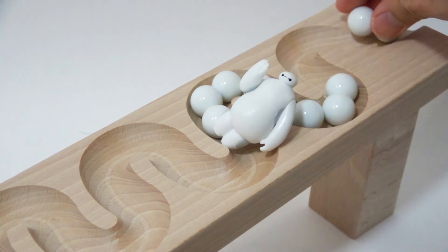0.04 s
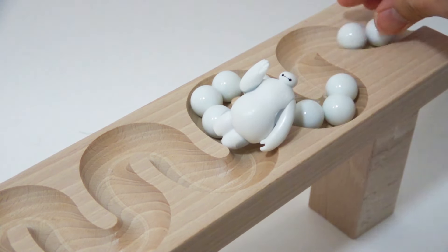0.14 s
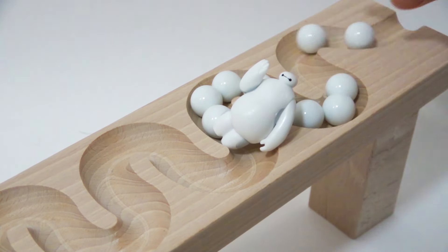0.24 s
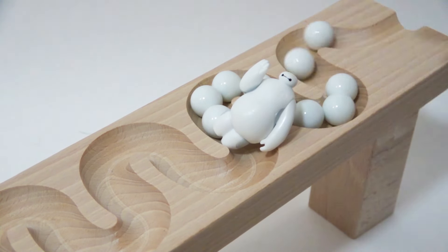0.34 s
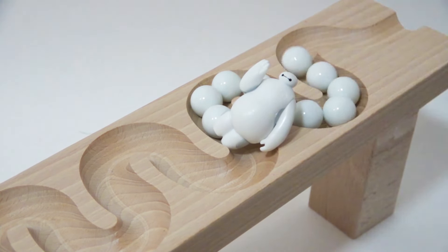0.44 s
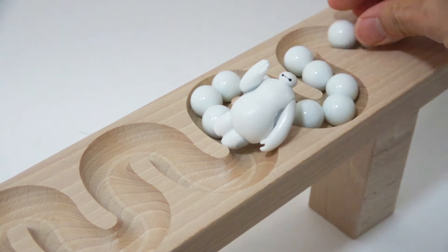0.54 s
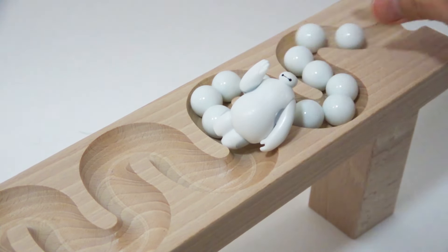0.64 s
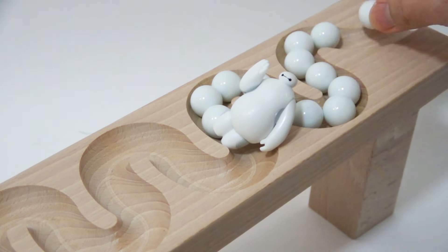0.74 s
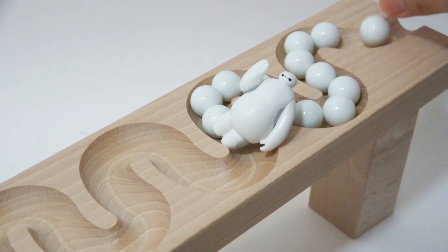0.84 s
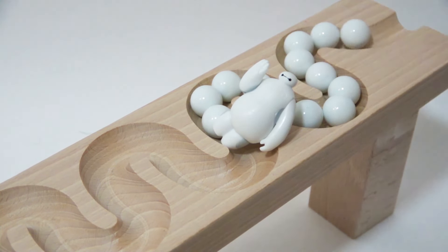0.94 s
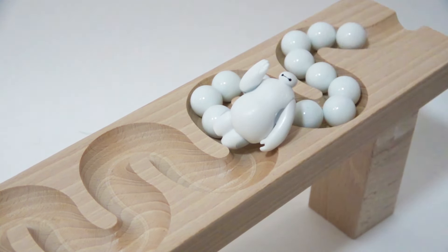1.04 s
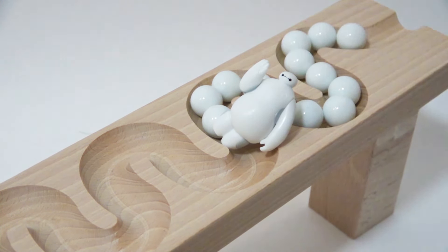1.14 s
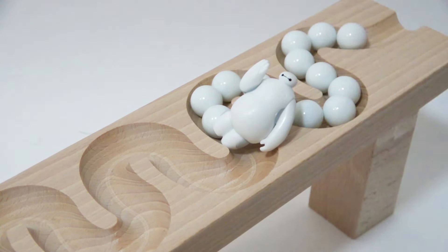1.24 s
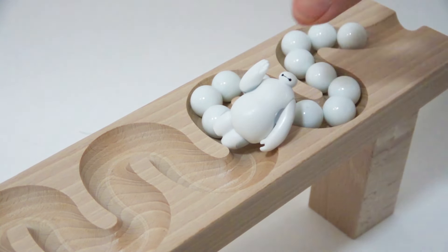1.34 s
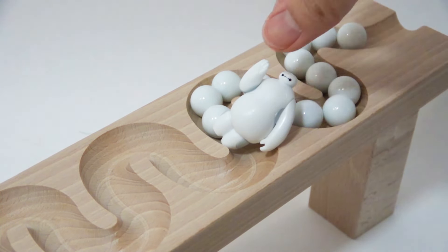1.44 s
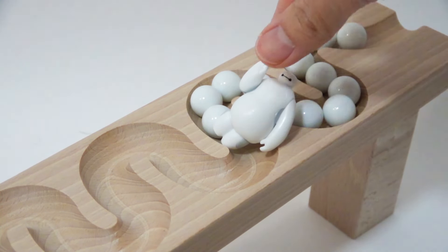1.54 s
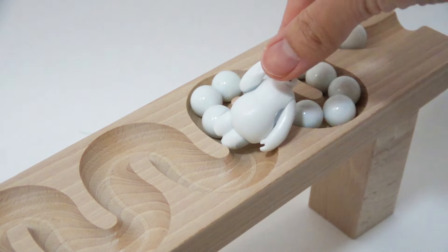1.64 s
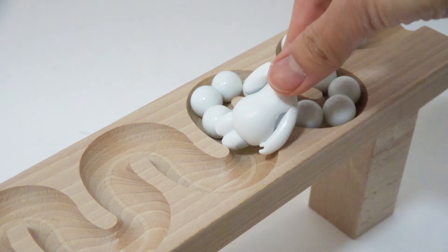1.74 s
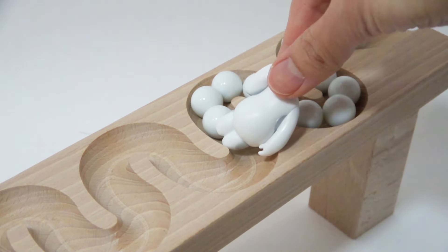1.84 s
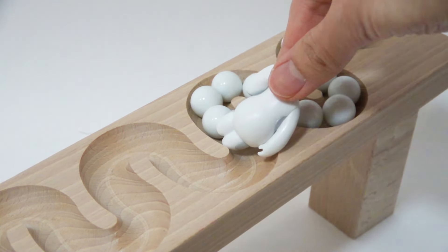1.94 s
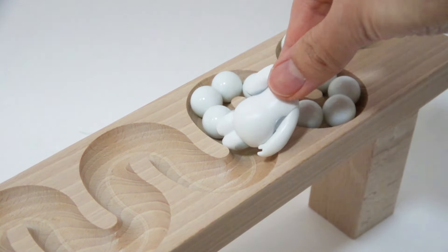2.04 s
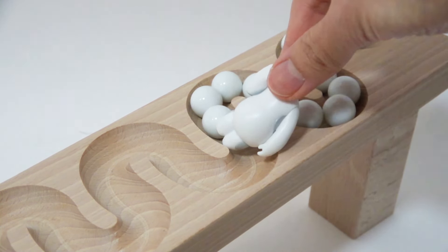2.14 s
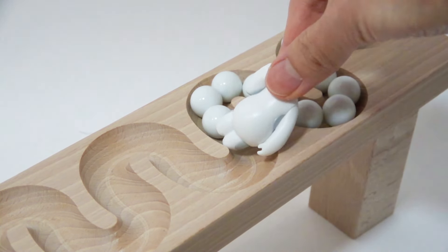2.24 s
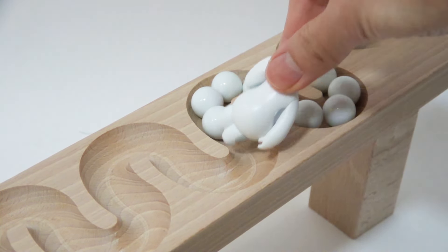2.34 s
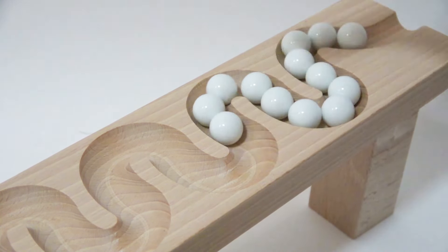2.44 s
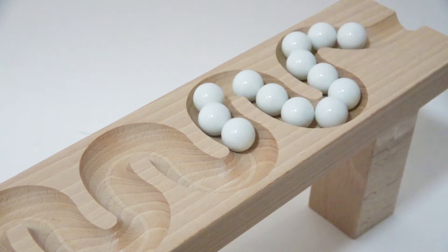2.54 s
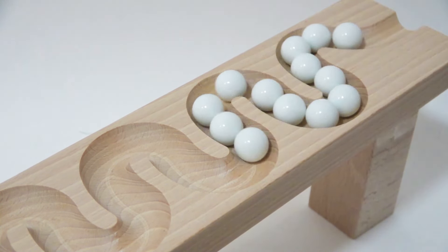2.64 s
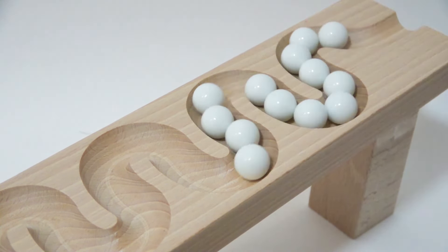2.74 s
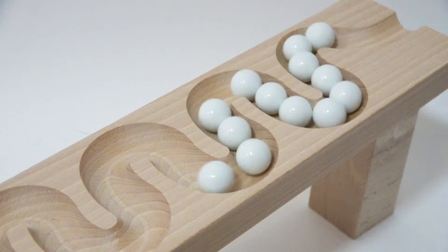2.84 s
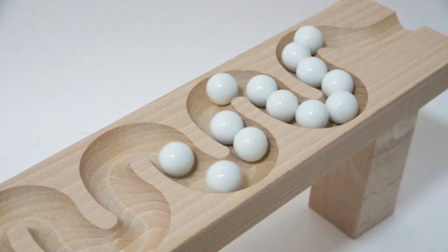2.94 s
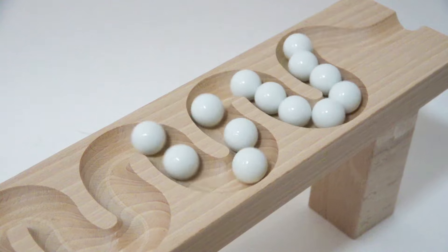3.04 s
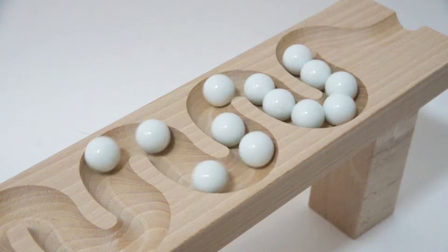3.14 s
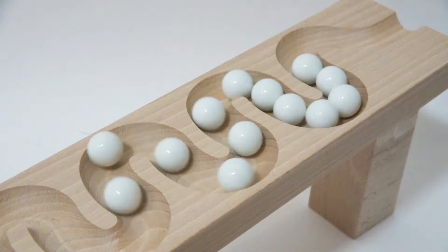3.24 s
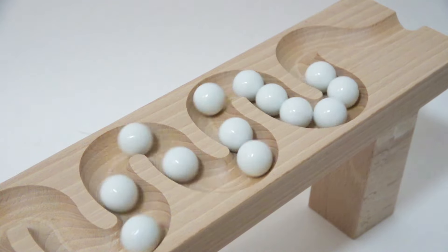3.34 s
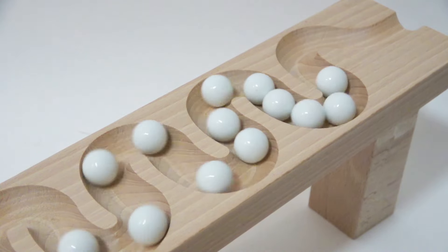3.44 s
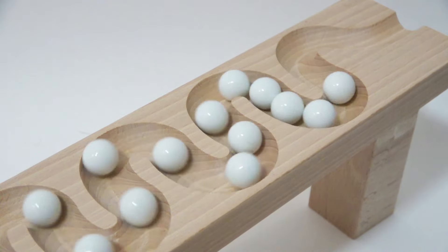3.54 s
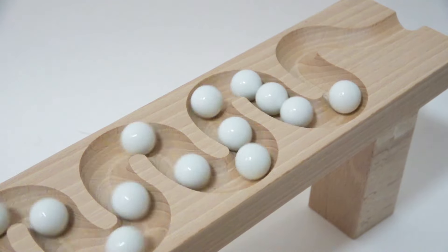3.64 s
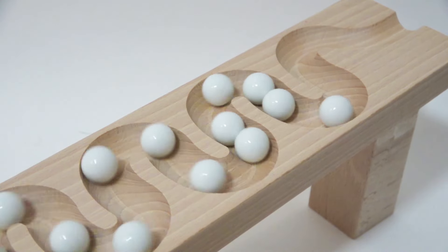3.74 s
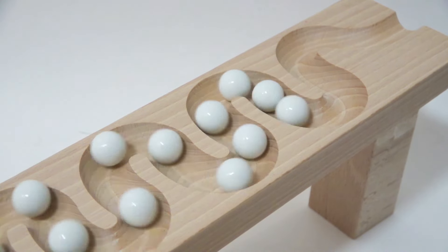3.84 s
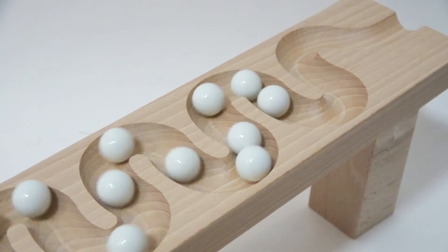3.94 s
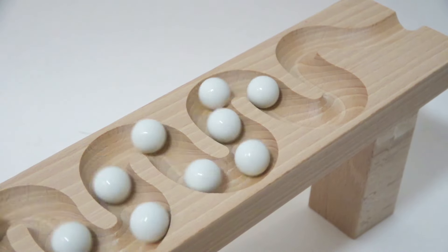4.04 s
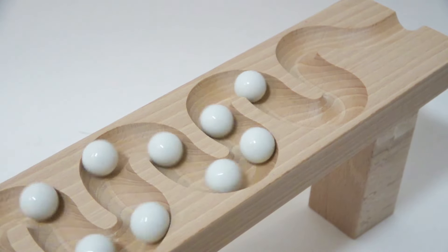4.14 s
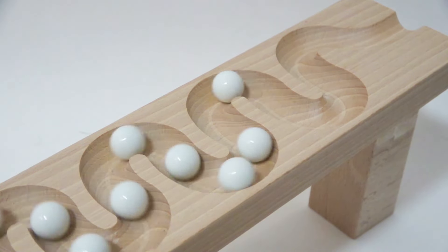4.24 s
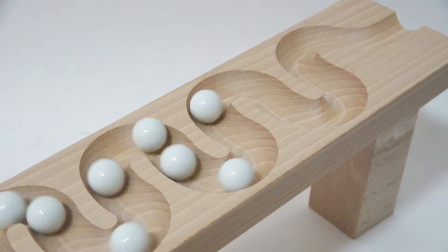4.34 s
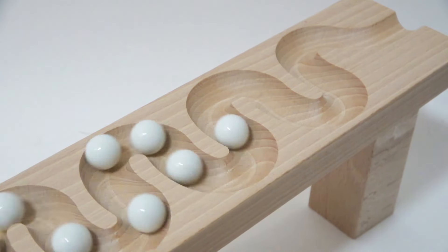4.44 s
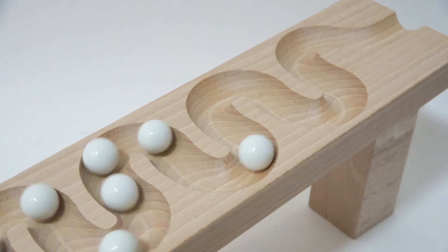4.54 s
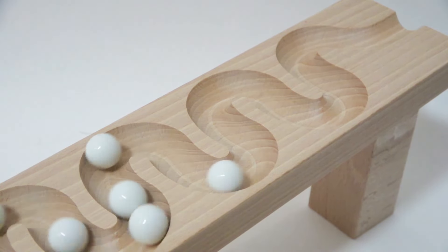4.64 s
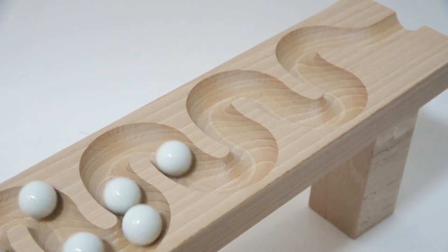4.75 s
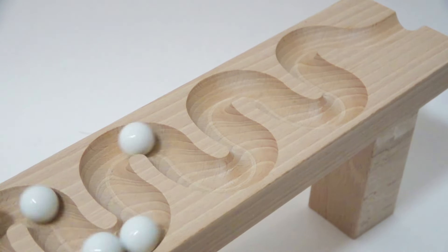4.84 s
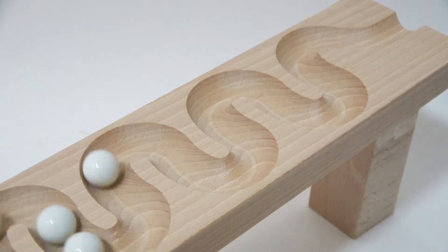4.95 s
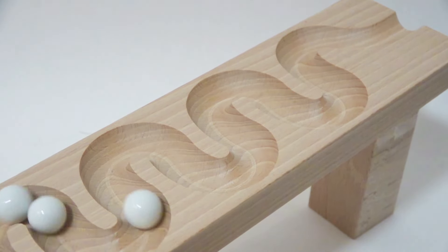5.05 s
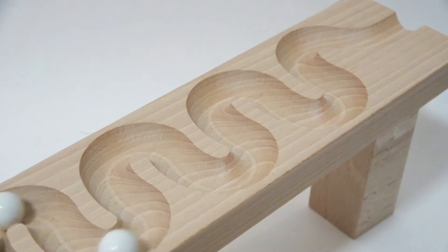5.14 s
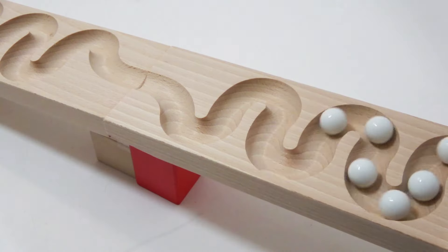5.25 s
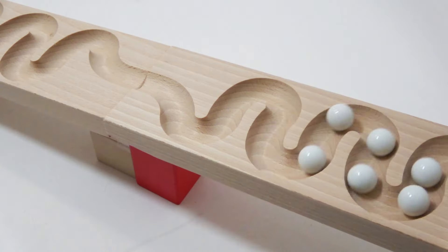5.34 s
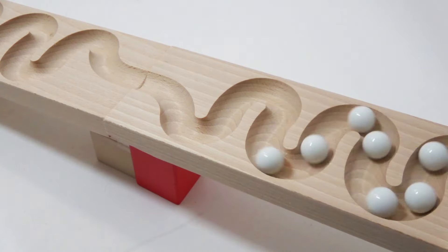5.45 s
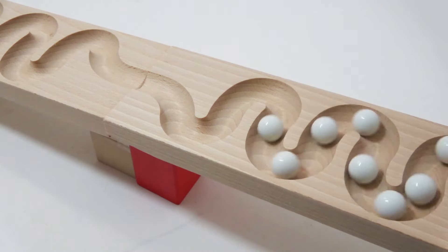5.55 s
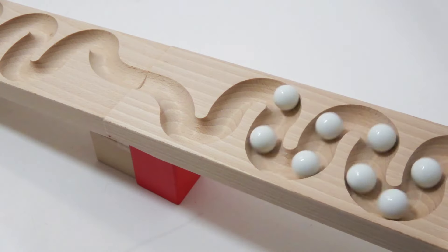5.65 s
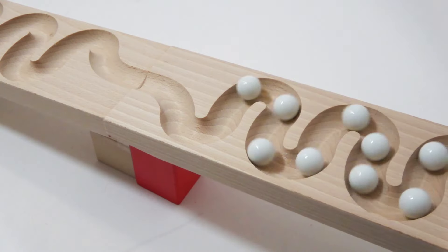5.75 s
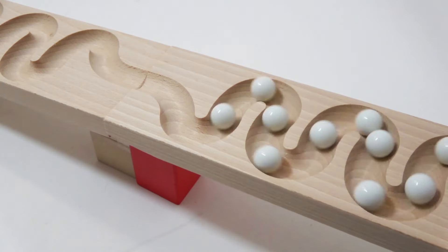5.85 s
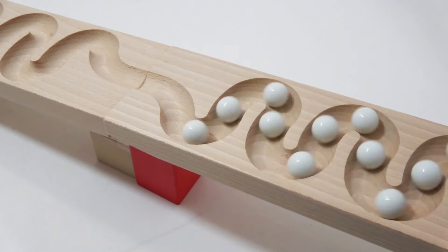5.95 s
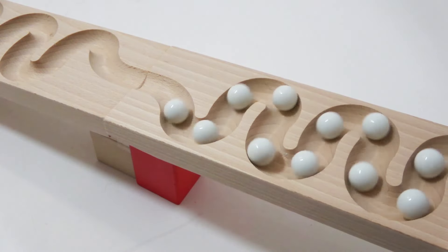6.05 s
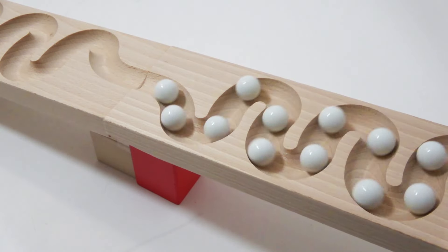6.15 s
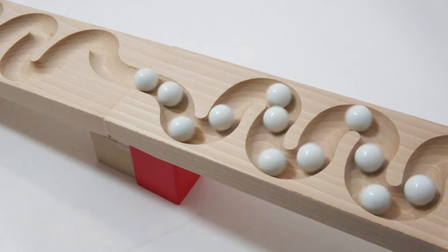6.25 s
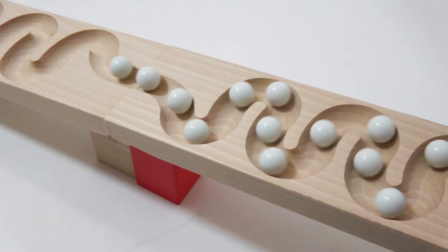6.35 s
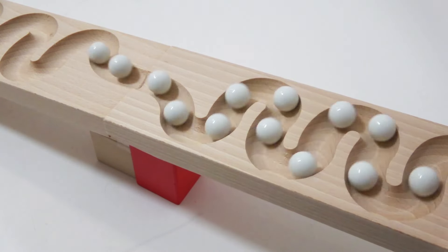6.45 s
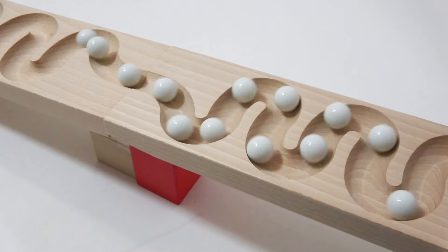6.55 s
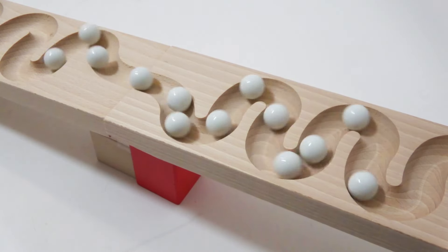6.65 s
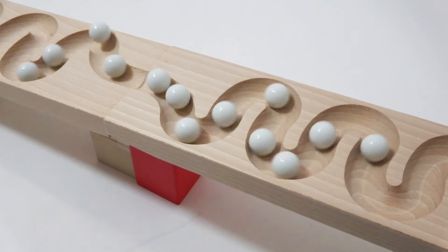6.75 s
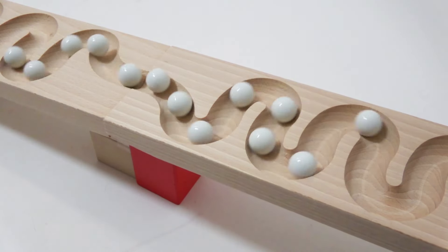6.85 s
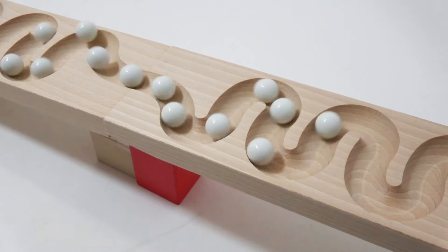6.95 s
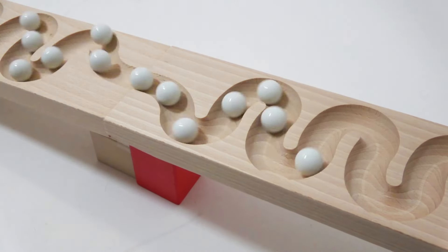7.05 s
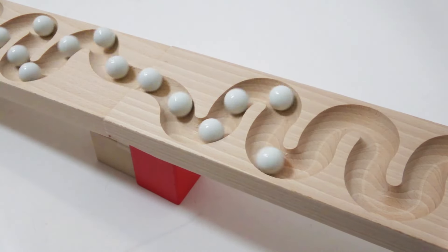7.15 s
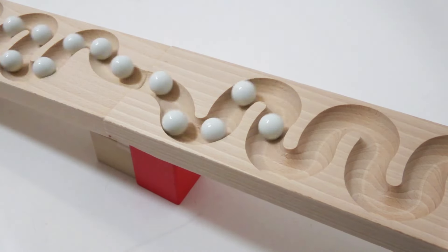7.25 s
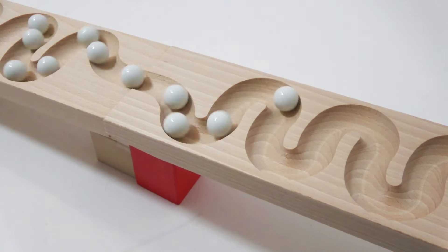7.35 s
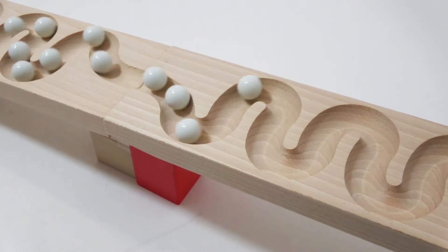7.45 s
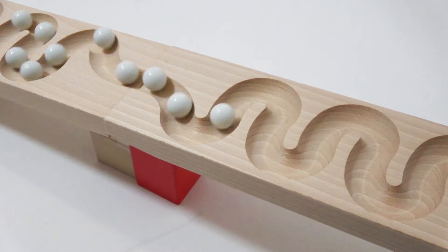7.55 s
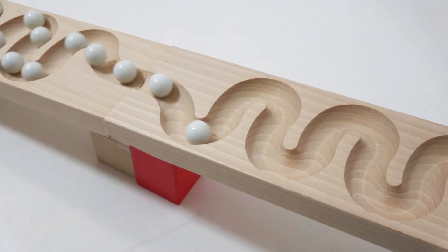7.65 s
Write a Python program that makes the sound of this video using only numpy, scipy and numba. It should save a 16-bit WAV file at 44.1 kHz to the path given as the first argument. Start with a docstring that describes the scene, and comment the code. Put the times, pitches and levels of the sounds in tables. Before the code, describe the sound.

A close, dry stereo sound in a small quiet room, with faint steady hiss and a wavering low hum underneath. From 0 to 1.1 seconds, glass marbles are placed on a grooved wooden slope: brief rumbling rolls, short bright glass clicks and sharp woody knocks, with abrupt cuts near 0.04, 0.56 and 0.82. Very soft low thuds follow around 1.1 to 1.3, then near stillness until a faint thud at about 2.5. The marbles are let go and roll quietly, swelling steadily, with small ticks of glass on glass. From about 3.5 wooden knocks join, becoming crowded and gritty from 4 to 5.2. At 5.3 the sound cuts abruptly to a smoother roll with sparse knocks; from 6.2 it hardens into a loud, dense rattle of marbles against wood, continuing until the end at roughly 7.7.

```python
"""A marble rumbles briefly over faint hiss and hum, and a glass click follows: marbles are set by hand
on a grooved wooden slope in a small room, wait behind a toy, then roll down in a stream that clatters.
Rolling, knocks on the groove walls and soft thuds shake the plank's modes; marbles click on each other as
short bright rings; decaying noise makes the room. At each splice plank and room fall silent within 3 ms."""
import sys
import numpy as np
from scipy import signal
from scipy.fft import rfft, irfft
from scipy.io import wavfile
from numba import njit

SR = 44100
rng = np.random.default_rng(int(sys.argv[2]) if len(sys.argv) > 2 else 0)


def unload_wav(signal):
    """Save mono or channel-first audio to the path in sys.argv[1] as 16-bit WAV at rate SR, clipped to [-1, 1]."""
    wavfile.write(
        sys.argv[1],
        SR,
        np.round(np.clip(np.atleast_2d(signal).T, -1, 1) * 32767).astype(np.int16),
    )


N = 339129


def amp(db):
    """Convert dB to gain."""
    return 10 ** (np.asarray(db) / 20)


def rms_one(x):
    """Scale to rms 1."""
    return x / np.sqrt(np.mean(x ** 2) + 1e-20)


def drift(per_s):
    """Slow random wander of rms 1: noise knots, 60 a second, through two equal low-passes."""
    knots = rng.standard_normal(int(N / SR * 60) + 400)
    r = np.exp(-2 * np.pi * per_s / 60)
    slow = signal.lfilter([1], [1, -2 * r, r * r], knots)[300:]
    return np.interp(np.arange(N) / SR * 60, np.arange(len(slow)), rms_one(slow))


def resonance(x, hz, width_hz):
    """Two-pole resonance; a unit click rings at a height of about 1."""
    r = np.exp(-np.pi * width_hz / SR)
    w = 2 * np.pi * hz / SR
    return signal.lfilter([0, np.sin(w)], [1, -2 * r * np.cos(w), r * r], x + 1e-18)


# Where plank and room start afresh. Each entry: start of a stretch in seconds.
STRETCH_STARTS_S = [0, .038, .556, .824, 1.425, 5.296]


def spliced(process, x):
    """Each stretch between splices starts from silence and fades out over its last 3 ms."""
    edges = [round(s * SR) for s in STRETCH_STARTS_S] + [N]
    parts = []
    for a, b in zip(edges, edges[1:]):
        fade = np.minimum(np.arange(b - a, 0, -1) / (.003 * SR), 1)
        parts.append(process(x[a:b])[..., :b - a] * fade)
    return np.concatenate(parts, axis=-1)


@njit
def soften(x, keep):
    """Double one-pole low-pass whose edge moves."""
    out, a, b = np.empty_like(x), 0., 0.
    for i in range(len(x)):
        a += (1 - keep[i]) * (x[i] - a)
        b += (1 - keep[i]) * (a - b)
        out[i] = b
    return out


def grains(per_s, spread_db):
    """Random contacts of uneven size and either sign; rms 1."""
    sizes_db = spread_db * np.minimum(rng.exponential(1, N), 5)
    sizes = amp(sizes_db) * rng.choice([-1, 1], N)
    return rms_one(sizes * (rng.random(N) < per_s / SR))


# Spectrum of the fan and microphone hiss in the room.
# Each row: frequency in Hz, relative level in dB per Hz.
HISS_SPECTRUM = [(25, -15), (52, -1), (75, -56), (110, 1), (150, -16.5), (300, -21), (700, -19),
                 (1100, -13), (1450, -18.5), (1750, -27.5), (2400, -33), (8000, -30), (13000, -29.5),
                 (16500, -44)]
HISS_DB, HISS_SIDE_DB = -58.5, -7.5   # side against mid
HUM_HZ, HUM_WIDTH_HZ, HUM_DB = 114, 14, -63


def floor():
    """Steady shaped noise for the hiss, and noise through a narrow resonance for a wavering low hum."""
    hz = np.arange(N // 2 + 1) * SR / N + 1
    at_hz, level_db = np.transpose(HISS_SPECTRUM)
    shape = amp(np.interp(np.log(hz), np.log(at_hz), level_db))
    mid, side = irfft(rfft(rng.standard_normal((2, N))) * shape, N)
    hiss = rms_one(mid + amp(HISS_SIDE_DB) * side * [[1], [-1]])
    hum = rms_one(resonance(rng.standard_normal(N), HUM_HZ, HUM_WIDTH_HZ))
    return amp(HISS_DB) * hiss + amp(HUM_DB) * hum


# Marbles set down by hand roll briefly on the slope.
# Each row: start in seconds, roll length in seconds, relative rumble level in dB.
HAND_ROLLS = [(.0, .04, -25.5), (0.11, 0.049, -39.5), (0.175, 0.052, -29), (0.29, 0.55, -34.5),
              (0.576, 0.01, -35), (0.636, 0.053, -27.5), (0.784, .04, -27.5), (0.89, 0.023, -26),
              (1.003, 0.061, -29.5), (1.113, 0.24, -47)]
# The stream gathers speed down the slope.
# Each row: start in seconds, relative rumble level at the start in dB, the same at full speed in dB,
# time constant in seconds, middle of the clatter's onset in seconds.
MARBLE_STREAMS = [(2.459, -50, -23.5, 0.54, 3.92), (5.296, -31, -23, 0.48, 6.15)]
ROLL_RISE_DB_PER_S, ROLL_FALL_DB_PER_S, STILL_DB = 2500, 169.5, -78
GRIT_DB, CLATTER_DB = -38, 17   # grit against the rumble; its gain once the stream clatters
CLATTER_ONSET_S = 0.45


def rolling_levels():
    """Short rolls die within their stretch; streams approach full speed and then clatter (share 0-1)."""
    t = np.arange(N) / SR
    edges = STRETCH_STARTS_S + [N / SR]
    stretch = np.searchsorted(edges, t, "right")
    rumble_db, clatter = np.full(N, float(STILL_DB)), np.zeros(N)
    for s, length_s, roll_db in HAND_ROLLS:
        rise_db = ROLL_RISE_DB_PER_S * np.maximum(s - t, 0)
        fall_db = ROLL_FALL_DB_PER_S * np.maximum(t - s - length_s, 0)
        same = stretch == np.searchsorted(edges, s, "right")
        rumble_db = np.where(same, np.maximum(rumble_db, roll_db - rise_db - fall_db), rumble_db)
    for s, start_db, full_db, rise_s, clatter_s in MARBLE_STREAMS:
        speeding_db = full_db + (start_db - full_db) * np.exp(-np.abs(t - s) / rise_s)
        rumble_db = np.where(t >= s, speeding_db, rumble_db)
        onset = .5 + .5 * np.tanh((t - clatter_s) / CLATTER_ONSET_S)
        clatter = np.where(t >= s, onset, clatter)
    return rumble_db, rumble_db + GRIT_DB + CLATTER_DB * clatter, clatter


RUMBLE_TOP_HZ = 1516   # smooth rolling is too soft to reach far above this


def rolling_force():
    """Wood grain under the marbles pushes softly, sharper as they speed up; grit adds fine hard contacts."""
    rumble_db, grit_db, clatter = rolling_levels()
    sharp_hz = np.clip(1600 * amp(0.43 * rumble_db + 13.5), 50, 9000)
    keep = np.exp(-2 * np.pi * sharp_hz / SR)
    rumble = soften(soften(grains(per_s=2500, spread_db=2.5), keep), keep)
    rumble = signal.sosfilt(signal.butter(4, RUMBLE_TOP_HZ, fs=SR, output="sos"), rumble)
    grit_band = signal.butter(2, [1500, 7000], "band", fs=SR, output="sos")
    grit = signal.sosfilt(grit_band, grains(per_s=500, spread_db=3.5))
    bursts_db = 5 * np.clip(drift(14), -2, 1.5) - 12
    rumble_push = rumble * amp(rumble_db + 1.97 * drift(40) - 23.0)
    return rumble_push + grit * amp(grit_db + bursts_db), clatter


# Modes of the grooved plank.
# Each row: frequency in Hz, width in Hz, relative level in dB, left against right in dB.
PLANK_MODES = [(124, 27.5, -13, 0), (145.3, 18.2, -9, -1), (247, 23.4, -8, 1.7), (309, 15.7, -9, 2.5),
               (371, 40, -3.5, 3), (471, 64.4, -9.5, -1.5), (595, 56.7, -7, 0), (660, 34.6, -8.5, -4),
               (779, 128, -1.5, -1), (908.5, 56, -6, -2), (1048, 182, 0.5, -2), (1294, 136, 0, -2.5),
               (1525, 123, 0.5, -2), (1713, 98, -4, 1.7), (1996, 140, -1, -3), (2230, 124, -4, 3.5),
               (2698, 228, 3.5, -1.4), (3126, 140, -6, 1.5), (3406, 107, -8, 2.1), (3833, 100, -14.5, 1),
               (4277, 250, -13, 0), (4720, 120, -20.5, -5), (5207, 160, -19.5, 4), (5700, 250, -26.5, -5),
               (6210, 140, -24, 0), (7320, 1700, -19, 4)]
# Modes that answer more lower down the slope, where the stream clatters.
# Each row: frequency in Hz, gain in dB at full clatter.
LOWER_SLOPE_MODES = [(1715, 6.5), (3410, 2.5)]
LEAN_TOP_DB, LEAN_BOTTOM_DB = -1.05, 0.65   # left against right, before and at full clatter
MODE_WANDER_DB = 1.5   # each mode is driven a little unevenly as the marbles move


def plank():
    """Wood modes ring under the rolling, the knocks with their rattle, and the thuds."""
    force, clatter = rolling_force()
    chatter = grains(per_s=1500, spread_db=3)
    rebound_at, rebound_gain = rebounds()
    out = np.zeros((2, N))
    for k, (hz, width_hz, mode_db, pan_db) in enumerate(PLANK_MODES):
        knocks = knock_blows(hz, rebound_at, rebound_gain)
        rattle = wall_rattle(knocks, hz, chatter)
        blows = knocks + thud_blows(hz)
        lower_db = sum(db for near_hz, db in LOWER_SLOPE_MODES if abs(np.log(near_hz / hz)) < .06)
        wander = amp(MODE_WANDER_DB * drift(12))
        push = ((force + rattle) * wander + blows) * amp(lower_db * clatter)
        rings = spliced(lambda x: resonance(x, hz, width_hz), push)
        out += (-1) ** k * amp(mode_db) * rings * amp([[pan_db / 2], [-pan_db / 2]])
    # the plank radiates little deep bass or top treble
    edges = np.vstack([signal.butter(4, 100, "high", fs=SR, output="sos"),
                       signal.butter(2, 8500, fs=SR, output="sos")])
    lean_db = LEAN_TOP_DB + (LEAN_BOTTOM_DB - LEAN_TOP_DB) * clatter
    return signal.sosfilt(edges, out) * amp(lean_db / 2 * [[1], [-1]])


# Marble on marble in the groove. Each row: time in seconds, relative level in dB.
GLASS_HITS = [(0.021, -9), (0.148, -27), (0.191, -16), (0.2477, -17.5), (0.4896, -9.5), (0.533, -13),
              (0.5517, -9), (0.7879, -7), (0.8125, -11), (1.049, -12.5), (1.0533, -18), (1.0845, -18.5),
              (2.5594, -28.5), (2.6344, -26), (2.7096, -25), (2.744, -29), (2.7837, -27), (2.7922, -24),
              (2.875, -17.5), (2.934, -30), (2.9432, -31.5), (3.0387, -27), (3.051, -26.5), (3.1561, -22.5),
              (3.2063, -13), (3.279, -24), (3.3131, -30.5), (3.4113, -13.5), (3.44, -29), (3.5484, -27),
              (3.5665, -35), (3.5871, -13), (3.688, -13), (3.8504, -13), (3.968, -13), (4.0351, -16.5),
              (4.504, -26.5), (4.7664, -11.5), (4.962, -22), (5.1739, -12), (5.317, -26), (5.4208, -28),
              (5.459, -30), (5.492, -17.5), (5.608, -30.5), (5.7345, -15), (5.9353, -22), (5.9953, -14)]
TABLE_ECHO_S, TABLE_ECHO_DB = .0042, -14


def glass_clicks():
    """Brief bright rings; left and right add reflections off groove and table, row three feeds the room."""
    out = np.zeros((3, N + 2000))
    luck = rng.random((len(GLASS_HITS), 4))
    for (s, level_db), (wait, strength, pitch, place) in zip(GLASS_HITS, luck):
        height = amp(level_db + 6.5)
        blow = np.zeros((3, 2000))
        blow[:, 0] = height
        groove_s = .0006 + .0003 * wait
        blow[:2, round(groove_s * SR)] = -height * (.6 + .3 * strength)
        blow[:2, round(TABLE_ECHO_S * SR)] = height * amp(TABLE_ECHO_DB)
        rings = resonance(blow, 7500 + 1200 * pitch, width_hz=1640)
        at = round(s * SR)
        lean_db = 3 * (place - .55) * np.array([[1], [-1], [0]])
        out[:, at:at + 2000] += rings * amp(lean_db)
    edges = np.vstack([signal.butter(4, 3400, "high", fs=SR, output="sos"),
                       signal.butter(1, 14000, fs=SR, output="sos")])
    return signal.sosfilt(edges, out[:, :N])


ROOM_T60_S, ROOM_DB, ROOM_SIDE_DB = 0.15, -4.5, -5.5


def room(x):
    """Dense reflections: decaying noise, alike on both sides except in the treble."""
    t = np.arange(SR // 2) / SR
    envelope = amp(-60 * t / ROOM_T60_S) * np.clip(t / 0.0023, 0, 1)
    mid, side = rng.standard_normal((2, len(t))) * envelope
    side = signal.lfilter(*signal.butter(1, 3200, "high", fs=SR), side)
    mid = signal.lfilter(*signal.butter(1, 11000, fs=SR), mid)   # walls dull the top
    both = mid + amp(ROOM_SIDE_DB) * side * [[1], [-1]]
    tail = amp(ROOM_DB) * both / np.sqrt(np.sum(mid ** 2))
    return spliced(lambda part: signal.fftconvolve(part[None], tail, axes=1), x)


# Marble on the wooden groove wall.
# Each row: time in seconds, relative level in dB, treble tilt in dB per octave above 2500 Hz.
WALL_KNOCKS = [(0.1656, -11, -15), (0.1903, -5, 18.5), (0.2501, -13, 9), (0.356, -27, -29),
               (0.4881, -18, -23), (0.5328, -10, -4), (0.5822, -13.5, 15), (0.6394, -5.5, 13.5),
               (0.664, -14, 15.5), (0.6919, -16.5, -34), (0.7874, -19, 0), (0.8123, -10.5, -3),
               (0.8939, -4.5, -7), (0.9545, -2.5, 12.5), (1.0118, -17.5, 6), (1.019, -39, 1),
               (3.5071, -16.5, 1), (3.7289, -14.5, 0), (3.7766, -17, 11.5), (3.916, -18, -3),
               (3.967, -14, -3), (4.0052, -16.5, 12), (4.034, -9.5, 1), (4.158, -18.5, -16),
               (4.296, -12.5, -1), (4.3242, -8, 2.5), (4.3937, -13, -1), (4.4263, -12.5, -21),
               (4.443, -7, -0.5), (4.5529, -5, -8), (4.568, -7.5, 3), (4.586, -12, -1), (4.6074, -3.5, 8.5),
               (4.671, -11, 6.5), (4.7027, -5.5, -10), (4.8477, -3, 3), (4.885, -12, 2), (4.9031, -2.5, 6),
               (4.9595, -9.5, 0), (5.028, -6.5, -31), (5.0735, -3.5, 9.5), (5.14, -14, 5),
               (5.1593, -6.5, -1), (5.1852, -7.5, 8), (5.2163, -5, -51), (5.3805, -24, 5),
               (5.5604, -15.5, -4), (5.641, -17, -6), (5.6907, -17, 4.5), (5.7727, -12, -9),
               (5.9237, -17, 9), (5.9804, -11, 6.5), (6.0519, -9.5, 6), (6.2114, -13.5, 2.5),
               (6.3462, -18, 4.5), (6.3923, -2.5, 2.5), (6.4876, -12, 0), (6.508, -5.5, -1),
               (6.6285, -5, -10), (6.7761, -6, -7), (6.7945, -8, -2), (6.8198, 1, 11), (6.9248, -8.5, -7),
               (6.9443, -3, -5), (6.9651, -4.5, 19.5), (7.0331, -4.5, -10), (7.1189, -0.5, 11),
               (7.182, -6.5, 0), (7.21, -8, 4.5), (7.2232, -2.5, 7.5), (7.31, -4, -8), (7.322, -9, 1),
               (7.337, -6, 10), (7.443, -7, -11), (7.458, -6, -2), (7.5468, -7, -19), (7.6257, -2.5, -0.5)]
REBOUND_S, REBOUND_LOSS_DB = .0105, 9.5   # middle values; each rebound varies


def rebounds():
    """A knocking marble bounces back once, weaker and with opposite sign, unless a splice comes between."""
    s = np.transpose(WALL_KNOCKS)[0]
    at = np.round(s * SR).astype(int)
    wait, loss = rng.uniform([.88, .4], [1.12, 1.6], (len(at), 2)).T
    rebound_at = at + (REBOUND_S * wait * SR).astype(int)
    gain = -amp(-REBOUND_LOSS_DB * loss)
    same = np.searchsorted(STRETCH_STARTS_S, rebound_at / SR) == np.searchsorted(STRETCH_STARTS_S, s)
    return rebound_at, gain * same


def knock_blows(hz, rebound_at, rebound_gain):
    """Knocks as one mode feels them: low modes get about half the push, hardness sets the high ones."""
    s, level_db, treble_db = np.transpose(WALL_KNOCKS)
    at = np.round(s * SR).astype(int)
    luck_db = rng.normal(0, 2.5, len(at))
    octaves = max(np.log2(hz / 2500), 0)
    blows = np.zeros(N)
    blows[at] = amp(level_db - 13.0 + luck_db + treble_db * octaves) * (0.49 + 0.49 / (1 + (1450 / hz) ** 5))
    blows[rebound_at] += blows[at] * rebound_gain
    return blows


RATTLE_DB = -28.5
RATTLE_T60_S, RATTLE_DULLS_HZ = 0.47, 4120   # decay towards 0 Hz; a mode at this pitch dies twice as fast


def wall_rattle(knocks, hz, chatter):
    """After a knock the marble grinds on along the wall; the treble dies first."""
    fade = amp(-60 * (1 + hz / RATTLE_DULLS_HZ) / (RATTLE_T60_S * SR))
    envelope = spliced(lambda x: signal.lfilter([1], [1, -fade], x + 1e-18), knocks)
    return amp(RATTLE_DB) * chatter * envelope


# Marbles settle on the slope and the toy is touched. Each row: time in seconds, relative level in dB.
SOFT_THUDS = [(1.111, -32), (1.204, -18), (1.32, -20), (2.487, -22.5)]


def thud_blows(hz):
    """Soft contacts push mainly the low modes."""
    blows = np.zeros(N)
    for s, level_db in SOFT_THUDS:
        blows[round(s * SR)] += amp(level_db - 11.0) / (1 + (hz / 430) ** 4)
    return blows


def scene():
    """Plank and clicks, their room, and the floor."""
    wood = plank()
    *glass, glass_in_room = glass_clicks()
    wood_in_room = amp(-10) * wood
    return wood + glass + room(wood_in_room.mean(axis=0) + glass_in_room) + floor()


CUTOFF_HZ = 17200   # 70 dB down from here up


def record(dry):
    """The sharpest peaks are rounded, the top is cut."""
    rounded = .75 * np.tanh(dry / .75)
    return signal.sosfilt(signal.cheby2(12, 70, CUTOFF_HZ, fs=SR, output="sos"), rounded)


dry = scene()
out = record(dry)
unload_wav(out)
```